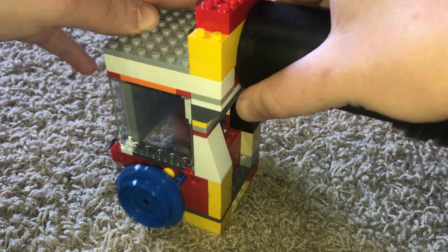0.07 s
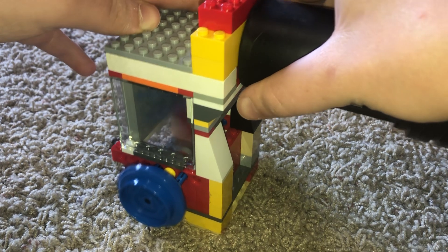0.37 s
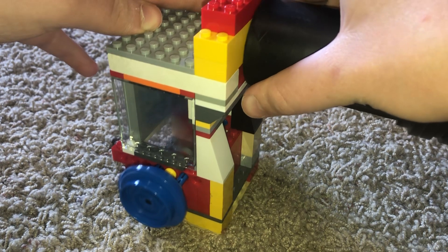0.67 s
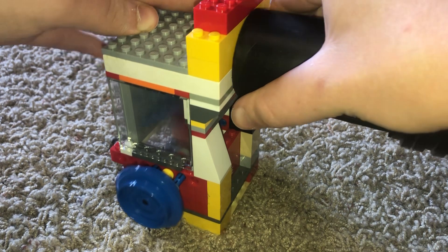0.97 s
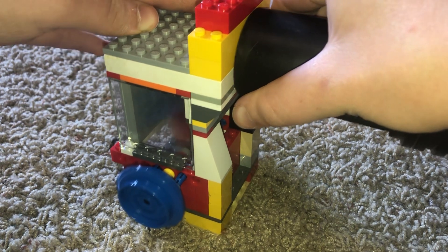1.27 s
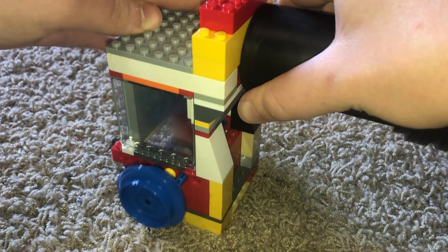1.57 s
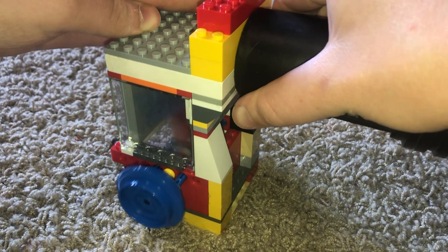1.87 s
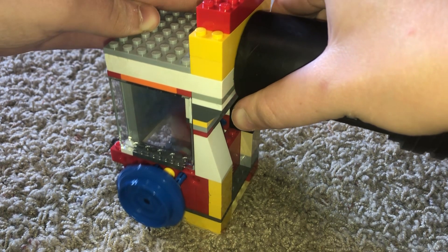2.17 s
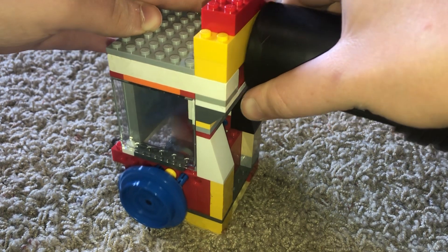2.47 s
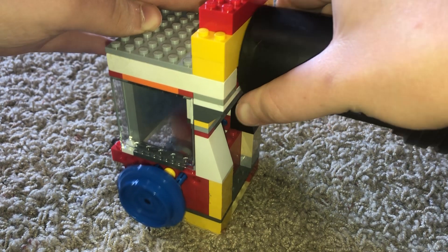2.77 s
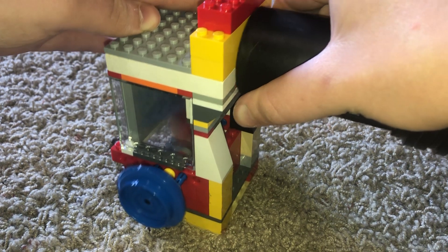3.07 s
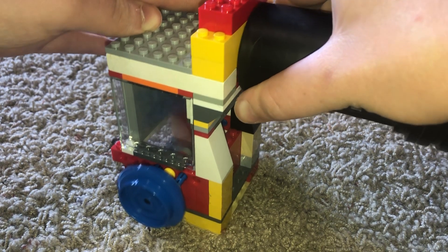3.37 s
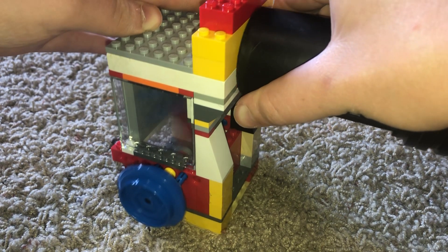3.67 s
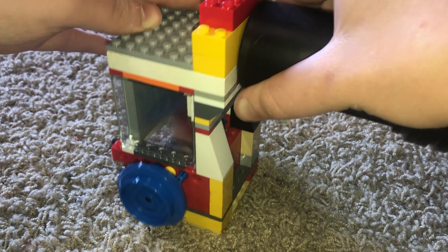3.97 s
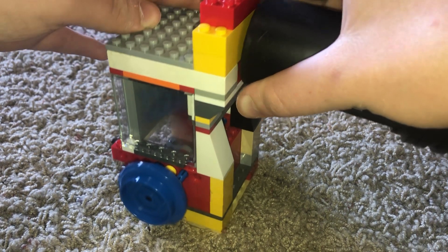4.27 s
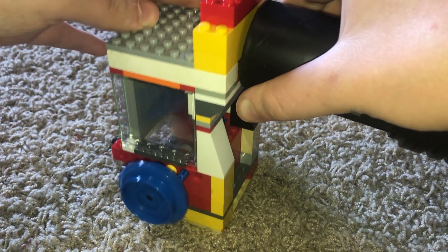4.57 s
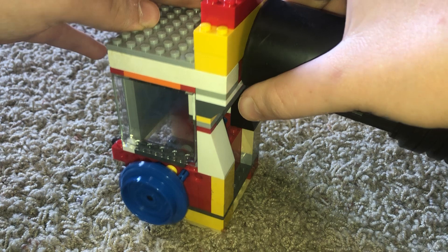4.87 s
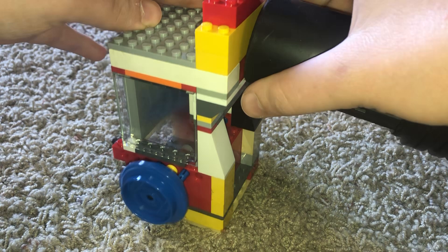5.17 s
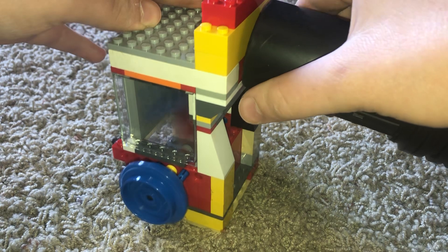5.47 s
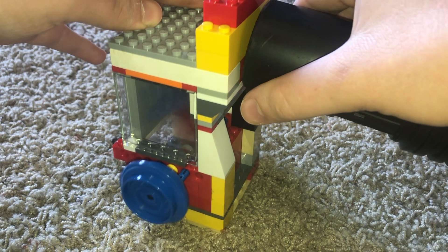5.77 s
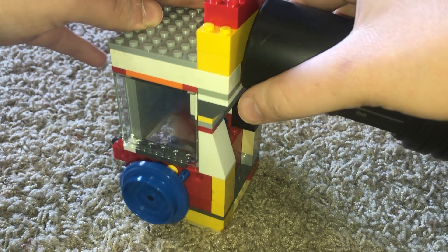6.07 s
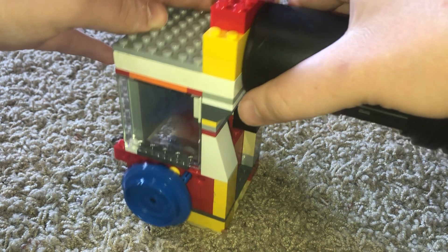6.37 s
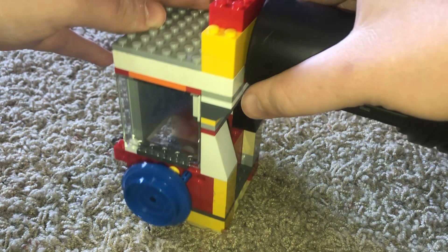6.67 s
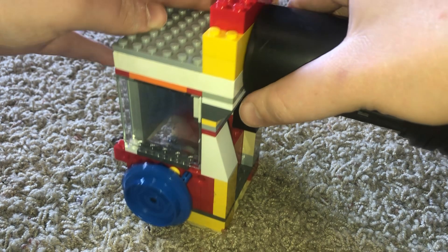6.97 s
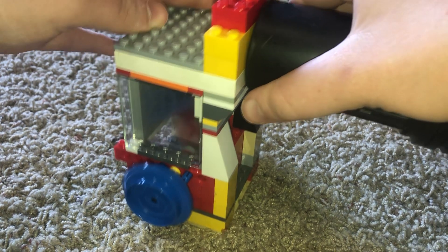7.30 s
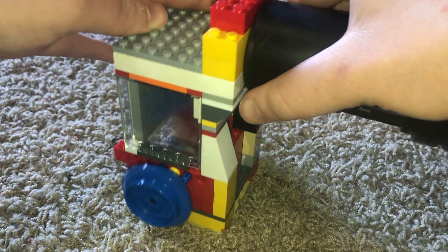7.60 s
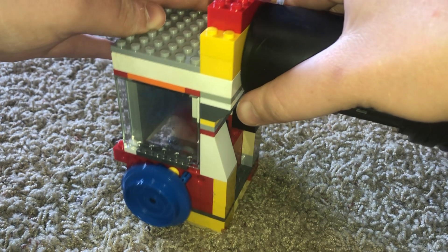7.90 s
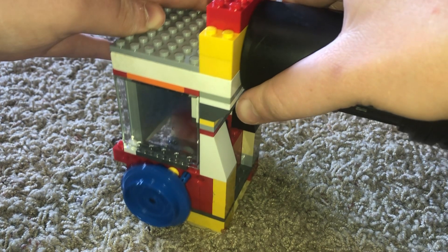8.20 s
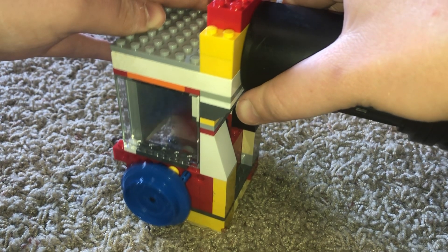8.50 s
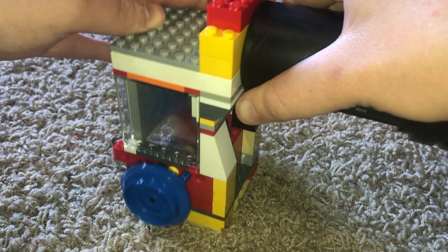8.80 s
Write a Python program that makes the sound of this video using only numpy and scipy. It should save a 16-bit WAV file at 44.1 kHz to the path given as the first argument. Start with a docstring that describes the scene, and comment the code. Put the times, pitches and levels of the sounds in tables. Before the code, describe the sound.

A vacuum cleaner hisses through a small plastic toy engine that rattles rapidly, slowing and speeding up.

```python
"""A carpeted room: a vacuum cleaner sucks air through a one-cylinder engine of plastic toy bricks.
Each turn the valve takes a hissing gulp and snaps shut; pressure pulses thump the hollow case.
As the hand-held nozzle shifts, air rushes over its rim, leaks and warbles through the gap,
and the engine slows. Loose parts chatter in short spells."""
import sys
import numpy as np
from scipy import signal
from scipy.fft import rfft, irfft
from scipy.io import wavfile
from scipy.ndimage import uniform_filter1d

SR = 44100
rng = np.random.default_rng(int(sys.argv[2]) if len(sys.argv) > 2 else 0)


def put_to_file(sound):
    """Save the sound as 16-bit audio at rate SR, in the file named by the first command-line argument."""
    columns = np.atleast_2d(sound).T  # one column per channel
    safe = np.clip(columns, -1, 1)
    whole_steps = np.round(safe * 32767)
    wavfile.write(sys.argv[1], SR, whole_steps.astype(np.int16))


N = 389844
T = np.arange(N) / SR
FFT_SIZE = 2 ** 19
BIN_HZ = np.fft.rfftfreq(FFT_SIZE, 1 / SR)
FULL_SPEED_HZ = 50.4

# Crank speed: time_s, speed_hz
CRANK_SPEED = [(0.0, 44.6), (0.185, 51.39), (0.329, 49.88), (0.506, 41.61), (0.735, 40.87), (0.947, 51.65),
               (1.292, 49.97), (1.442, 41.48), (1.755, 51.19), (2.378, 48.73), (2.551, 34.13),
               (2.68, 36.75), (2.814, 50.51), (3.106, 50.28), (3.212, 44.61), (3.399, 50.99),
               (3.887, 50.03), (4.286, 39.38), (4.371, 41.27), (5.02, 36.39), (5.376, 32.37), (5.59, 35.96),
               (6.146, 36.43), (6.33, 50.47), (6.71, 43.44), (7.084, 51.2), (7.446, 45.75), (7.687, 50.68),
               (8.84, 50.08)]
# Hand's hold on the nozzle: time_s, suction_db, fit (0 loose, 1 tight)
NOZZLE_GRIP = [(0.0, -1.5, 0), (0.26, 1.5, 0.07), (0.5, -1, 0), (1.0, 0, 0), (2.0, -0.26, 0), (3.1, 0, .15),
               (3.9, .5, 0.13), (4.2, 0, 0), (5.1, 0, 0), (6.15, -.5, 0.07), (6.35, -2, 0.73),
               (6.8, 0, 0.14), (7.45, -0.5, 0.67), (7.85, 0, 0.6), (8.84, -0.5, 1)]
# Valve opening over one turn, from the snap: phase_turns, opening_db
VALVE_CYCLE = [(0, -4), (.07, -6), (.15, -14), (.3, -22), (.44, -18), (.52, -6), (.59, 2.5), (.7, 3),
               (.84, -.5), (.95, -3)]
# Pressure pulse at full speed: harmonic, level_db
PULSE_HARMONICS = [(1, -47), (2, -48.5), (3, -43.5), (4, -50.5), (5, -43), (6, -39), (7, -47.5), (8, -52),
                   (9, -47), (10, -45.5), (11, -44), (12, -64), (13, -47.5), (14, -42.5), (15, -51),
                   (16, -55), (17, -40), (18, -51), (19, -41), (20, -47), (21, -33.5), (22, -40.5),
                   (23, -38.5), (24, -52), (25, -49.5), (26, -49.5)]
# Resonances of the hollow case: freq_hz, gain_db
CASE_RESPONSE = [(30, -34), (78, -28.5), (115, -24), (155, -9.5), (200, -22), (280, -6), (365, -5),
                 (420, -11.5), (520, 4), (820, 2), (1000, 6.5), (1130, -5), (1280, -12), (1380, -10)]
# Case hum near 300 Hz and ring near 1 kHz: time_s, hum_db, ring_db
CASE_HUM_RING = [(0.0, -39, -33), (0.27, -37, -27.5), (0.4, -38, -30.5), (2.6, -38.5, -30.5),
                 (3.8, -37.5, -30.5), (4.6, -32.5, -31), (5.35, -43.5, -32), (5.9, -40, -27),
                 (6.5, -35, -29.5), (7.4, -36.5, -30.5), (8.1, -35.5, -30), (8.3, -35.5, -33.5),
                 (8.84, -35.5, -33)]
# Cylinder resonances: pitch_hz, width_hz, level_db
CYLINDER_MODES = [(910, 510, -13.5), (2280, 510, -8), (4080, 590, -8.5), (6200, 1030, -5.5),
                  (7590, 850, 3.5), (9860, 600, -35), (11140, 530, -20), (13200, 2500, -21.5),
                  (14700, 800, -41)]

# Noise spectra: freq_hz, density_db
CHATTER_SPECTRUM = [(60, -40), (350, -26), (550, 1), (1100, 3.5), (1350, -7), (1600, 3), (2300, 5.5),
                    (3700, 4.5), (5200, 5.5), (8000, -43), (15000, -75)]  # loose parts
RIM_SPECTRUM = [(2000, -40), (4500, -19), (5500, -11), (6000, -3), (6550, 3), (7100, -2), (7700, -19),
                (10000, -23), (16000, -37)]  # air over the nozzle rim
GAP_SPECTRUM = [(300, -55), (1600, -28), (2050, -12), (2380, 1), (2750, -1), (3050, -5), (3500, -3.5),
                (3900, -8.5), (5500, -26), (15000, -55)]  # air squeezed past the nozzle
RUMBLE_SPECTRUM = [(40, -46), (150, -19.5), (290, -11.5), (430, -16), (540, -8), (850, -8.5), (1000, 0),
                   (1130, 2), (1280, -7), (1380, -13), (1600, -5), (5000, -28)]  # air in the case
LEAK_SPECTRUM = [(40, -48), (1400, -21), (2300, -12), (3200, -13), (4100, -10.5), (5450, -10.5), (6600, 1),
                 (7120, -5.5), (7620, .5), (8500, -4.5), (9600, -13), (10600, -14.5), (12000, -19.5),
                 (16000, -23)]  # air through the leaks
INTAKE_SPECTRUM = [(40, -20), (1400, -29), (2300, -10.5), (3400, -16), (4150, -9.5), (4800, -15),
                   (5800, -13.5), (6500, -1.5), (7100, 0), (7700, -0.5), (8600, -5), (10000, -15),
                   (12500, -23), (16000, -28)]  # air through the valve

# Spells of noise: start_s, rise_s, hold_s, relative_db
CHATTER_SPELLS = [(0.0, 0.004, 0.013, -27.5), (.39, 0.047, .25, -33.5), (.68, 0.049, 0.095, -31.5),
                  (1.35, 0.023, .2, -34.5), (2.46, 0.11, 0.14, -33.5), (3.18, 0.03, 0.009, -37)]  # loose parts
RIM_SPELLS = [(0.0, .005, 0.85, -21), (1.35, 0.13, 0.23, -23), (2.4, .15, 0.21, -25), (3.14, .08, .13, -23),
              (3.92, 0.18, .04, -21.5), (7.3, .1, .05, -21)]  # air over the nozzle rim
GAP_SPELLS = [(1.33, .12, 0.054, -23.5), (2.1, .3, .025, -24.5), (2.68, 0.026, .01, -23.5),
              (3.17, 0.041, .02, -28.5), (4.31, 0.064, 0.26, -20), (4.68, .12, 0.043, -22),
              (5.33, .2, 0.33, -29)]  # air squeezed past the nozzle


def from_db(db):
    return 10 ** (np.asarray(db) / 20)


def unit_rms(x):
    return x / np.sqrt(np.mean(x ** 2) + 1e-20)


def curves(rows):
    """A timed table's columns, per sample."""
    time_s, *columns = np.transpose(rows)
    return [np.interp(T, time_s, column) for column in columns]


def db_at(spectrum, hz):
    """Spectrum level, interpolated over log frequency."""
    freq_hz, db = np.transpose(spectrum)
    return np.interp(np.log(hz + 1), np.log(freq_hz + 1), db)


def colour(x, spectrum):
    """Filter by a spectrum; white noise keeps its power."""
    response = unit_rms(from_db(db_at(spectrum, BIN_HZ)))
    return irfft(rfft(x, FFT_SIZE) * response)[:N]


def wander(rate_hz):
    """Smooth random drift, unit RMS."""
    lowpass = np.exp(-(BIN_HZ / rate_hz) ** 2)
    return unit_rms(irfft(rfft(rng.standard_normal(FFT_SIZE)) * lowpass)[:N])


def turbulence(flicker_db, rate_hz):
    """White noise that comes in eddies, unit RMS."""
    return unit_rms(rng.standard_normal(N) * from_db(flicker_db * wander(rate_hz)))


def envelope(spells, release_s):
    """Summed gain of spells: linear rise, hold, exponential release."""
    gain = 0
    for start_s, rise_s, hold_s, db in spells:
        rise = np.clip((T - start_s) / rise_s, 0, 1)
        released_s = np.maximum(T - start_s - rise_s - hold_s, 0)
        gain += from_db(db) * rise * np.exp(-released_s / release_s)
    return gain


def speed_loss(speed_hz):
    """Crank speed lost, and the nozzle gap (0-1) that causes the loss."""
    lost_hz = np.maximum(FULL_SPEED_HZ - speed_hz, 0)
    return lost_hz, 1 - np.exp(-lost_hz / 3.14)


def valve_opening(turns, speed_hz, slip_turns_per_hz=.0089):
    """Valve opening as a gain; in a slow turn it reopens sooner after the snap."""
    phase_turns, opening_db = np.transpose(VALVE_CYCLE)
    early_turns = slip_turns_per_hz * (FULL_SPEED_HZ - speed_hz) * np.sin(np.pi * (turns % 1))
    return from_db(np.interp(turns + early_turns, phase_turns, opening_db, period=1))


def room_echo(x, level_db=-14.5, t60_s=.23):
    """Faint, short echo of a carpeted room."""
    t = T[:SR // 3]
    tail = rng.standard_normal(len(t)) * from_db(-60 * t / t60_s) * (t > .003)
    return from_db(level_db) * signal.oaconvolve(x, tail / np.linalg.norm(tail))[:N]


def parts_chatter(opening, gain_db=10.5):
    """Loose plastic parts buzz in the air stream: dense, uneven ticks."""
    ticks = unit_rms(turbulence(flicker_db=3.4, rate_hz=900) * (opening + .23))
    return colour(from_db(gain_db) * envelope(CHATTER_SPELLS, release_s=.026) * ticks, CHATTER_SPECTRUM)


def rim_rush(opening):
    """Air drawn over the nozzle rim, hardest with the valve open."""
    flow = unit_rms(turbulence(flicker_db=2, rate_hz=500) * (opening + .4))
    return colour(envelope(RIM_SPELLS, release_s=.054) * flow, RIM_SPECTRUM)


def gap_warble(opening, gain_db=2):
    """Air squeezes past the nozzle in short, rough whistles."""
    flow = unit_rms(turbulence(flicker_db=3, rate_hz=150) * (opening + 1.6))
    return colour(from_db(gain_db) * envelope(GAP_SPELLS, release_s=.058) * flow, GAP_SPECTRUM)


def case_rumble(opening, push, gain_db=-31):
    """Air that does no work on the piston rumbles in the case."""
    flow = opening + 1.03 / push  # a slow engine also leaks with the valve shut
    flow /= np.sqrt(uniform_filter1d(flow ** 2, size=8000))
    spare_power = np.maximum(1.6 - push ** 2, 0)
    rumble = colour(rng.standard_normal(N) * flow, RUMBLE_SPECTRUM)
    return from_db(gain_db) * np.sqrt(spare_power) * rumble


def pulse_band(turns, speed_hz, first, last, smear_cycles=.23):
    """Pressure-pulse harmonics sliding through the case resonances, unit power."""
    band, power = 0, 0
    for k, db in PULSE_HARMONICS[first - 1:last]:
        gain = from_db(db + db_at(CASE_RESPONSE, k * speed_hz) - db_at(CASE_RESPONSE, k * FULL_SPEED_HZ))
        lag_cycles = k * .051 + smear_cycles * rng.standard_normal()  # peak just after the snap
        band += gain * np.cos(2 * np.pi * (k * turns - lag_cycles))
        power += gain ** 2 / 2
    return band / np.sqrt(power)


def case_thump(turns, speed_hz, opening, fit):
    """Piston pressure pulses and air rumble sound through the hollow case."""
    lost_hz, gap = speed_loss(speed_hz)
    hum_db, ring_db = curves(CASE_HUM_RING)
    push = from_db(-1.04 * lost_hz)  # a slow piston pushes softly
    beat = from_db(-48 - 1.6 * lost_hz + 3 * fit) * pulse_band(turns, speed_hz, 1, 1)
    boom = from_db(-45.5 - 7 * gap + 10.5 * fit) * pulse_band(turns, speed_hz, 2, 4)
    hum = from_db(hum_db - 6 * gap) * pulse_band(turns, speed_hz, 5, 10)
    knock = pulse_band(turns, speed_hz, 11, 26) * (valve_opening(turns, speed_hz) + .84)
    ring = from_db(ring_db) * push * unit_rms(knock)
    return beat + boom + hum + ring + case_rumble(opening, push)


def valve_hiss(opening, speed_hz, fit, surge_hz_per_s=48):
    """Air gulps through the open valve and goes through the leaks while it is shut."""
    lost_hz, gap = speed_loss(speed_hz)
    pickup_hz_per_s = np.maximum(uniform_filter1d(np.gradient(speed_hz) * SR, size=3000), 0)
    surge_db = np.tanh(pickup_hz_per_s / surge_hz_per_s)  # harder gulps while speeding up
    intake_db = -15.5 + 3 * gap - .34 * lost_hz + surge_db
    leak_db = -27.5 + 10 * gap - 8.5 * fit
    gulps = from_db(intake_db) * opening * turbulence(flicker_db=1.6, rate_hz=700)
    shut = np.sqrt(np.clip(1 - opening ** 2, .05, 1))
    leak = from_db(leak_db) * shut * turbulence(flicker_db=3.5, rate_hz=230)
    stray = np.clip((leak_db + 31.5) / 17.5, 0, 1)  # a poor seal gives the gulps the leak's colour
    return colour((1 - stray) * gulps, INTAKE_SPECTRUM) + colour(leak + stray * gulps, LEAK_SPECTRUM)


def valve_snaps(turns, speed_hz, base_db=-19.5, spread_db=3.3, jitter_s=.00008, scrape_s=.0012):
    """The valve shuts once a turn: a click and a short scrape ring the cylinder."""
    _, gap = speed_loss(speed_hz)
    shut_at = np.flatnonzero(np.diff(np.floor(turns + .02)) > 0)
    force, jitter = rng.standard_normal((len(shut_at), 2)).T
    force_db = np.interp(T, T[shut_at], spread_db * force)
    click_at = shut_at + np.round(jitter * jitter_s * SR).astype(int)
    clicks = np.zeros(N)
    clicks[np.clip(click_at, 0, N - 1)] = 1
    t = T[:512]
    scrapes = .1 * rng.standard_normal(N) * signal.oaconvolve(clicks, np.exp(-t / scrape_s))[:N]
    ring = 0
    for pitch_hz, width_hz, db in CYLINDER_MODES:
        swell_and_decay = width_hz ** 2 * t * np.exp(-1.2 * np.pi * width_hz * t)
        ring += from_db(db) * swell_and_decay * np.sin(2 * np.pi * pitch_hz * t)
    snaps = unit_rms(signal.oaconvolve(clicks + scrapes, ring)[:N])
    return from_db(base_db - 4 * gap + force_db) * snaps


def scene():
    """One crank times hiss, thump and snaps; the valve also pulses the nozzle noise and chatter."""
    speed_hz, = curves(CRANK_SPEED)
    suction_db, fit = curves(NOZZLE_GRIP)
    turns = np.cumsum(speed_hz) / SR - .267
    opening = valve_opening(turns + .024 * wander(rate_hz=40), speed_hz)  # the valve has play
    hiss = valve_hiss(opening, speed_hz, fit)
    thump = case_thump(turns + .002 * wander(rate_hz=17), speed_hz, opening, fit)
    direct = from_db(suction_db) * (hiss + thump) + valve_snaps(turns, speed_hz)
    direct += rim_rush(opening) + gap_warble(opening) + parts_chatter(opening)
    return (direct + room_echo(direct))[None]


def record(dry):
    """Soft peak limit, then low-pass."""
    ceiling, cutoff_hz = .82, 15900
    rounded = dry / (1 + (dry / ceiling) ** 6) ** (1 / 6)
    lowpass = signal.firwin(511, cutoff_hz, window=("kaiser", 9), fs=SR)
    return signal.oaconvolve(rounded, lowpass[None], "same")


dry = scene()
out = record(dry)
put_to_file(out)
```